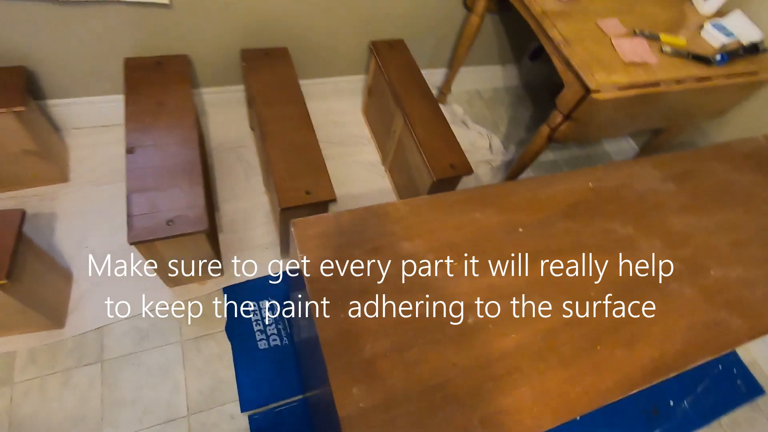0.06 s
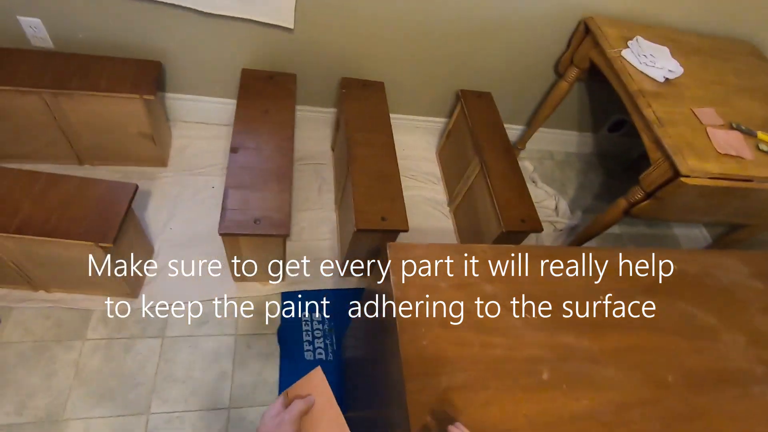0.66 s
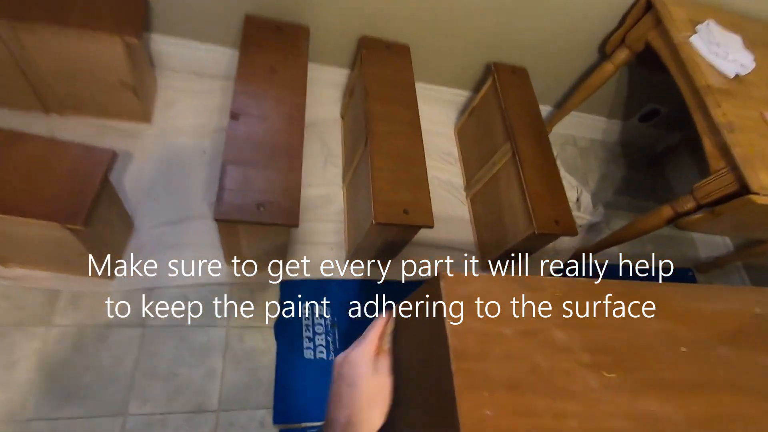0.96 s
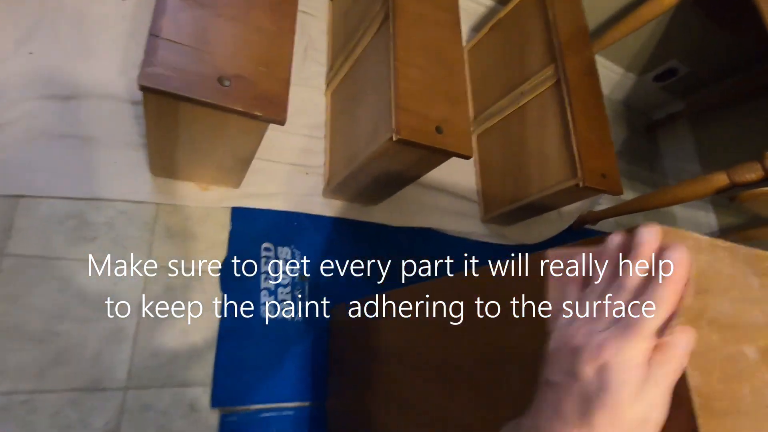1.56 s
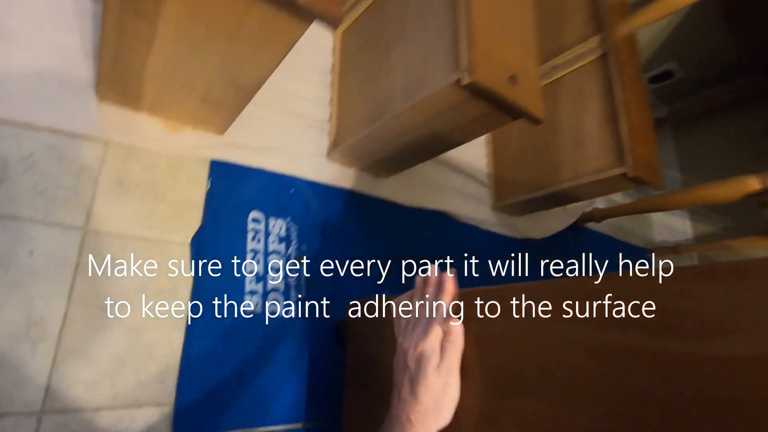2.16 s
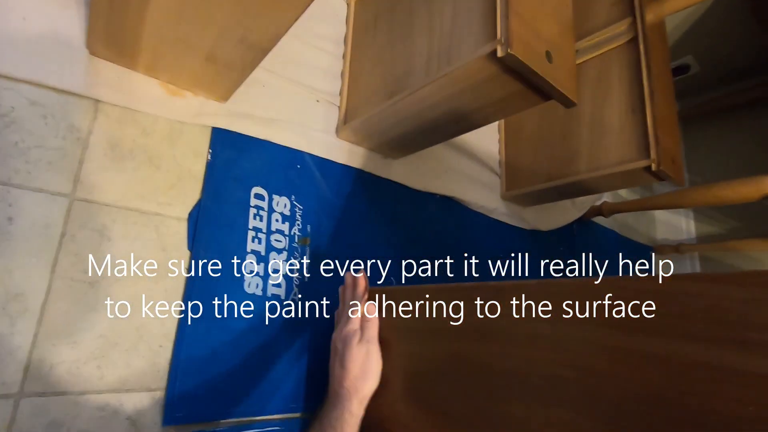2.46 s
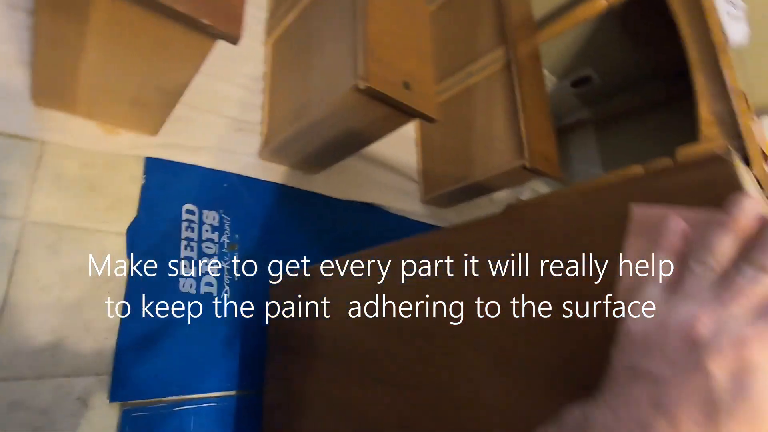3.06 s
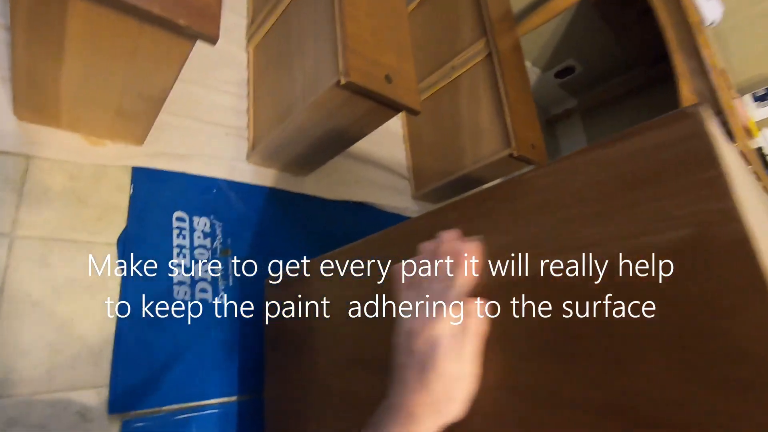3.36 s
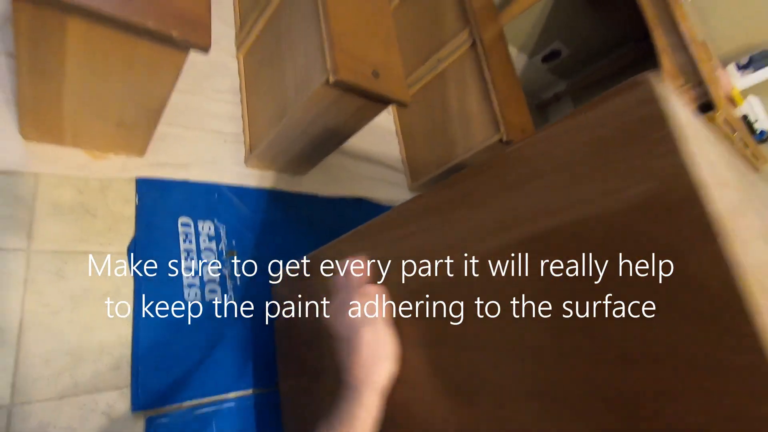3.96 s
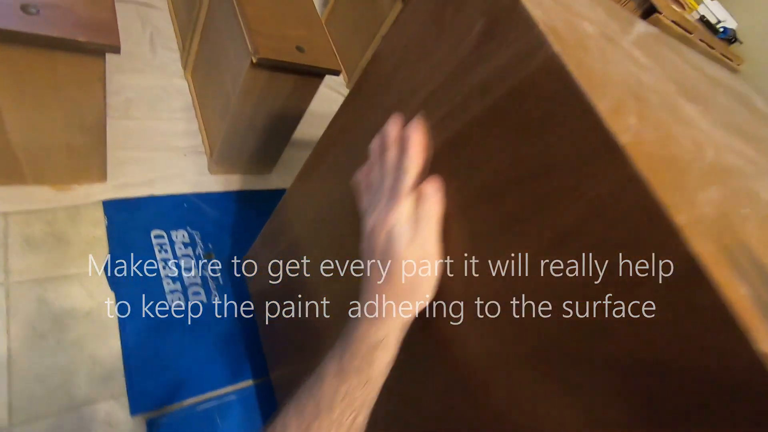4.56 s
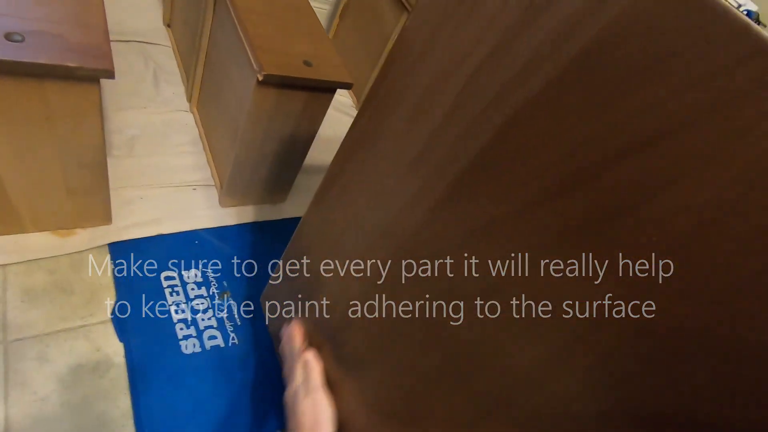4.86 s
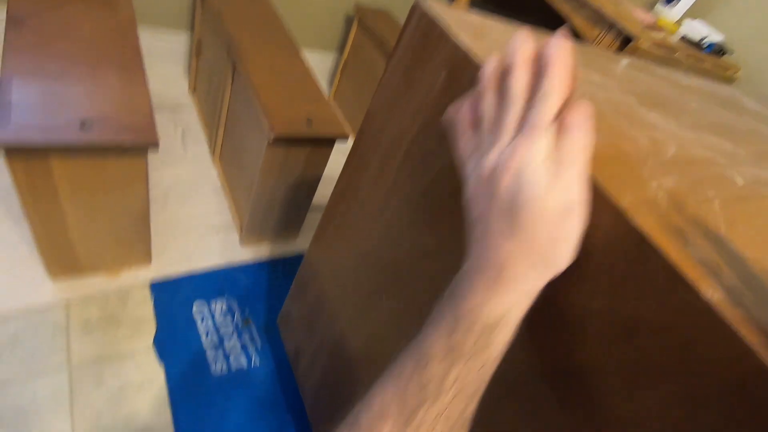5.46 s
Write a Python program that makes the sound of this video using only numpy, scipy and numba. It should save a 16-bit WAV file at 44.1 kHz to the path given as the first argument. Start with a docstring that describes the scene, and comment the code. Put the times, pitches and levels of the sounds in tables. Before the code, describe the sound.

In a small room, someone handles a stiff sheet of sandpaper and bumps a wooden dresser, then sands its side by hand. The gritty, hissing strokes go back and forth at an irregular pace, slowing briefly at the turns, with a hollow rasp from the wood and occasional knocks and paper snaps. The nearby hand-held microphone catches a few low puffs of air and a very faint appliance hum.

```python
"""Sandpaper is rubbed to and fro by hand over the side of a hollow wooden dresser in a small room.
Its grit catches and lets go thousands of times a second, so the paper hisses, the side panel rasps
and the wooden body drones. Cloth and paper rustle first; dull knocks and sharp paper ticks come
before and during the strokes. Air puffs against the hand-held microphone and an appliance hums."""
import sys
import numpy as np
from scipy import signal
from scipy.fft import rfft, irfft
from scipy.io import wavfile
from scipy.ndimage import uniform_filter1d
from numba import njit

SR = 44100
rng = np.random.default_rng(int(sys.argv[2]) if len(sys.argv) > 2 else 0)


def output_pcm(signal):
    """Save a mono or channel-first signal as 16-bit PCM at the path in sys.argv[1].

    Samples are clipped to [-1, 1] before scaling.
    """
    pcm = np.clip(np.atleast_2d(signal).T, -1, 1) * 32767
    wavfile.write(sys.argv[1], SR, np.round(pcm).astype(np.int16))


N = 247401
T = np.arange(N) / SR
FFT_SIZE = 2 ** 18
FREQS = np.fft.rfftfreq(FFT_SIZE, 1 / SR) + 1e-3


# Strokes, each lasting until the next. Place 0 is the stiff top corner, about 1 the loose lower end.
# start t/s, start place, share of speed kept in the turn, speed-up/s, slow-down/s,
# hiss level/dB, its change along the stroke/dB, treble share/dB,
# sheet ring f/Hz, its glide/Hz, ring against hiss/dB, air pocket f/Hz, pocket against hiss/dB
STROKES = [ (1.337, 0.83, 0.062, 0.099, 0.066, -33, 0, -4, 3230, 0, -5, 1370, -13),
           (1.565, 0.17, 0.16, 0.048, 0.095, -32, 0.5, -3, 3430, 0, -6.5, 1330, -16.5),
           (1.734, 0.27, 0.2, 0.056, .07, -34, 2.5, -4.5, 3300, 200, -12, 1345, -16.5),
           (2.451, 0.52, 0.65, 0.11, 0.055, -28.5, 3.5, -4.5, 3440, 2, -6.5, 1390, -10),
           (2.584, 0.82, 0.11, 0.061, 0.2, -29.5, 2.5, -2.5, 4550, 2398, -6, 1420, -18),
           (3.207, 0.19, .1, 0.11, .05, -31.5, -1, -4.5, 3730, -800, -8.5, 1425, -19),
           (3.912, 0.88, 0.43, 0.055, 0.18, -30.5, 1.5, -3.5, 4100, 6, -13, 1520, -19),
           (4.438, 0.3, .11, 0.11, 0.068, -33, -3, -3.5, 3380, 800, -5, 1530, -17),
           (5.09, 1.06, 0.15, 0.063, 0.095, -32, 1, -3.5, 3750, -400, -9, 1495, -18.5), ]
# The hand presses or eases for a moment: t/s, hiss change/dB, wood change/dB, length/s
PRESSES = [(1.845, 5.5, 0, 0.11), (1.936, 1, 2, 0.051), (2.36, 1.5, -1.5, 0.057), (2.519, 0, 7.5, 0.036),
           (2.625, -4.5, 3.5, 0.089), (2.753, 2, -3.5, 0.095), (3.123, -4.5, 8, 0.11),
           (3.667, 1.5, -1, 0.04), (3.807, -3, -1, 0.15), (3.877, 1.5, 5, 0.075), (4.143, 1.3, 0.5, 0.19),
           (4.384, 7, 6.5, 0.065), (4.534, -2.5, -4.5, 0.088), (4.653, 0, -1.5, 0.048),
           (5.032, 2, 7, 0.021), (5.152, -5, 2, 0.053), (5.342, 1, 1, 0.081)]


def sanding():
    """Grit catches in uneven bursts, shaking the sheet, the air under the hand and the wood."""
    speed, place, stroke, along = hand()
    settings = uniform_filter1d(np.transpose(STROKES)[5:, stroke], size=900)  # blend stroke into stroke
    hiss_db, change_db, treble_db, ring_hz, glide_hz, ring_db, pocket_hz, pocket_db = settings
    paper_press_db = sum(db * swell(t, length) for t, db, _, length in PRESSES)
    wood_press_db = sum(db * swell(t, length) for t, _, db, length in PRESSES)
    hiss_db = hiss_db + change_db * (along - .5) + paper_press_db
    ring_hz = ring_hz + glide_hz * (along - .5)
    ring_db = ring_db + 0.2 * paper_press_db  # pressing makes the sheet ring more
    swing = np.sin(np.pi * along) - 2 / np.pi  # the arm swings most freely in mid-stroke
    grip = (1 + 0.12 * flurries(per_s=570, decay_s=0.0041)) * undb(.5 * wander(per_s=34))
    grit = [unit(grip * grains(per_s=15000, spread_db=2.0)) for _ in range(4)]
    on_sheet, on_ring, on_pocket, on_wood = grit
    hiss = paper_hiss(on_sheet, on_ring, speed, swing, ring_hz, ring_db, treble_db)
    pocket = air_pocket(on_pocket, speed, swing, pocket_hz) * undb(pocket_db)
    dresser = rasp_and_drone(on_wood * undb(wood_press_db), speed, place)
    touching = np.clip((T - STROKES[0][0]) / 0.0081, 0, 1)  # silent until the first stroke
    return ((hiss + pocket) * undb(hiss_db) + dresser) * touching


# Tone of grit on paper: f/Hz, level/dB
PAPER_TONE = [(500, -27), (1100, -16.5), (2000, -6), (2450, -1.5), (2850, 4), (3350, 5.5), (4000, 3),
              (4600, 1.5), (5200, -1.5), (6800, -4.5), (8200, -11), (9400, -7.5), (10900, -24),
              (14000, -30), (15300, -43)]


def paper_hiss(on_sheet, on_ring, speed, swing, ring_hz, ring_db, treble_db):
    """Faster grit hisses louder and brighter; the sheet's ring wanders as the fingers shift."""
    paper = colour(PAPER_TONE)
    sheet = unit(filtered(on_sheet, paper))
    ring_hz = ring_hz * (1 + .06 * wander(per_s=16))
    ring = unit(moving_band(filtered(on_ring, paper), ring_hz, width_hz=650.))
    ring = ring * undb(ring_db + 2.6 * wander(per_s=16))
    treble_db = treble_db + 1.5 * swing + 0.41 * 20 * np.log10(speed)
    return brighten(sheet + ring, treble_db, split_hz=5040) * speed ** 1.68


def air_pocket(grit, speed, swing, hz):
    """Air under the hand rings, higher in mid-stroke and lower as the hand slows."""
    hz = hz * (1 - 0.05 * (1 - speed) + .06 * swing)
    once = moving_band(grit, hz, width_hz=390.)
    twice = moving_band(once, hz, width_hz=390.)
    return unit(twice) * speed ** 1.86


# Grit pushes the body in short jerks, which favour its higher notes: f/Hz, level/dB
JERK_TONE = [(150, -6), (250, -1.5), (305, -3), (400, 4.5)]


def rasp_and_drone(grit, speed, place):
    """The wood answers most at its loose end, and fades less than the hiss when the hand slows."""
    rasp_db, drone_db = -54.5 + 11 * place, -60 + 13.5 * place
    grit = grit * undb(1.08 * wander(per_s=54))
    rasp = grit * undb(rasp_db) * speed ** 0.46
    drone = filtered(grit, colour(JERK_TONE)) * undb(drone_db) * speed ** 0.37
    drag = undb(np.exp(-((speed - 0.64) / 0.19) ** 2))  # grit digs in at middling speed: up to 1 dB
    return wood(rasp * drag, drone * np.sqrt(drag))


# Notes at which the side panel rings: f/Hz, width/Hz, level/dB
PANEL_MODES = [(525, 72, 1), (683, 93, -6.5), (803, 55, 3), (1000, 114, -0.5), (1290, 255, 1),
               (1717, 385, 9), (1820, 570, 7.5), (2530, 230, -21)]
# Low notes of the hollow body: f/Hz, width/Hz, level/dB
BODY_MODES = [(169, 35, -1.5), (200.5, 22.5, 4), (199.7, 68, 1.5), (263, 30.4, 3), (304.7, 22.2, 4.5),
              (338, 58, -9.5), (474, 87, -17)]


def wood(panel_force, body_force):
    """Panel and body ring at their own notes (modes) and give off little sound below the lowest."""
    sound = 0
    for force, modes, cut_hz in ((panel_force, PANEL_MODES, 380), (body_force, BODY_MODES, 140)):
        # neighbouring modes swing in opposite directions
        notes = sum((-1) ** k * undb(db) * resonance(hz, width)
                    for k, (hz, width, db) in enumerate(modes))
        bass_cut = signal.butter(6, cut_hz, "high", fs=SR, output="sos")
        response = notes * signal.sosfreqz(bass_cut, FREQS, fs=SR)[1]
        sound = sound + filtered(force, response / np.sqrt(np.mean(np.abs(response) ** 2)))
    return sound


def hand():
    """The hand's speed (0-1), place, stroke number and way along it (0-1); it never quite stops."""
    end_s, end_place, end_speed = 5.625, 0.15, .15
    starts, places, turn_speeds, rises, falls = np.transpose(STROKES)[:5]
    turns = np.append(starts, end_s)
    pace = sum(movement(*timing) for timing in zip(starts, turns[1:], rises, falls))
    slowest = np.interp(T, turns, np.append(turn_speeds, end_speed))
    speed = np.sqrt(slowest ** 2 + (1 - slowest ** 2) * pace ** 2)
    place = np.interp(T, turns, np.append(places, end_place))
    progress = np.interp(T, turns, np.arange(len(turns)))
    stroke = np.minimum(progress.astype(int), len(starts) - 1)
    return speed, place, stroke, progress - stroke


# Dull knocks on the wood: t/s, body level/dB, panel level/dB, fade time/s, treble cut f/Hz
KNOCKS = [(-.01, -53.5, -51.5, 0.41, 1100), (0.718, -58, -59, 1, 700), (.848, -57, -53.5, 0.33, 2000),
          (0.866, -44, -40.5, 0.21, 1190), (1.118, -48, -50, 0.3, 2000), (1.26, -57, -48, 0.34, 2000),
          (1.349, -43.5, -52, 0.31, 191), (1.424, -45.5, -37, 0.071, 1470),
          (2.522, -47.5, -38.5, 0.22, 1820), (2.55, -57, -38, 0.091, 1800),
          (3.937, -51, -37.5, 0.082, 1900), (4.151, -42, -33, 0.028, 880), (4.159, -36.5, -62, 0.13, 230),
          (4.903, -50, -37, 0.039, 1200), (5.139, -46, -42, 0.061, 1200)]


def knocks():
    """Each blow pushes the wood once, then rattles; a softer contact sounds darker."""
    panel, body = 0, 0
    rattle = rng.standard_normal(N)
    for t, body_db, panel_db, fade_s, cut_hz in KNOCKS:
        force = rattle * fade(t, fade_s) + 2.27 * fade(t, fade_s=.0015)
        softened = signal.sosfilt(signal.butter(2, cut_hz, fs=SR, output="sos"), force + 1e-18)
        panel = panel + undb(panel_db) * softened
        body = body + undb(body_db) * softened
    return wood(panel, body)


# Snaps of the paper: t/s, level before the shared tone/dB, f/Hz, width/Hz, fade time/s
TICKS = [(0.095, -44, 3100, 910, 0.0077), (0.1005, -43, 3100, 380, 0.042), (1.121, -54, 3100, 2500, 0.21),
         (1.232, -41.5, 5900, 2630, 0.012), (1.264, -36, 3600, 2500, 0.0074),
         (1.267, -47.5, 3520, 3000, 0.17), (1.329, -39, 6500, 4000, 0.0088), (1.351, -42, 4000, 1200, .012),
         (2.604, -24, 5170, 3450, 0.03), (3.167, -28, 5970, 2430, 0.008)]
# Tone shared by all the snaps: f/Hz, level/dB
TICK_TONE = [(200, -6), (1000, 10.5), (7000, -3.5), (9500, -10), (11500, -20), (15000, -26)]


def ticks():
    """The stiff sheet snaps in short, bright bursts of noise."""
    noise = rng.standard_normal(N)
    snaps = sum(unit(filtered(noise, resonance(hz, width))) * undb(db) * fade(t, fade_s)
                for t, db, hz, width, fade_s in TICKS)
    return filtered(snaps, colour(TICK_TONE))


# Sleeve and loose paper move: start t/s, end t/s, rise/s, fall/s, level/dB, treble share/dB
RUSTLES = [(-.02, 0.058, 0.017, 0.13, -41.5, -5.5), (0.043, 0.323, 0.027, .04, -62.5, -21),
           (0.24, 0.356, 0.042, 0.098, -63, -12), (0.283, 0.61, 0.067, 0.13, -57.5, -6),
           (0.592, 1.126, 0.42, 0.16, -55, -8), (1.106, 1.198, .015, 0.12, -58, -6),
           (1.228, 1.4, 0.0073, 0.05, -54.5, -9)]
# Tone of their rustle: f/Hz, level/dB
RUSTLE_TONE = [(250, -6), (500, -6), (760, 2), (1000, -4.5), (1400, 1), (1750, 1), (2080, 3), (2500, -0.5),
               (3400, -2), (4600, -3.5), (5200, -9), (6500, -8), (8200, -12), (9600, -13.5), (10900, -38),
               (15000, -40)]
# The sheet slips between the fingers: t/s, level/dB, f/Hz, length/s
SCUFFS = [(0.422, -57, 5800, 0.022), (0.493, -55, 6300, 0.017), (0.567, -59.5, 4000, 0.023),
          (0.684, -60.5, 4160, 0.05)]


def rustle():
    """Cloth and loose paper slide softly until the hand lands on the wood."""
    fibres = filtered(grains(per_s=19000, spread_db=3.0), colour(RUSTLE_TONE))
    cloth = sum(brighten(fibres, treble_db, split_hz=4800) * undb(db) * movement(*timing)
                for *timing, db, treble_db in RUSTLES)
    noise = rng.standard_normal(N)
    scuffs = sum(unit(filtered(noise, resonance(hz, 0.36 * hz) ** 2)) * undb(db) * swell(t, length)
                 for t, db, hz, length in SCUFFS)
    return cloth + scuffs


# Puffs of air and handling bumps on the microphone: t/s, level/dB, f/Hz, length/s
PUFFS = [(1.094, -34.5, 46.2, 0.03), (1.129, -43, 87.5, 0.02), (1.176, -46.5, 44, 0.042),
         (1.48, -33, 25.8, 0.028), (1.569, -37, 22, 0.057), (2.547, -51, 95, .018), (2.63, -52, 32, .05)]


def air_puffs():
    """Each puff pushes the microphone's thin skin through a slow swing or two."""
    phases = rng.uniform(0, 2 * np.pi, len(PUFFS))
    return sum(undb(db) * swell(t, length) * np.sin(2 * np.pi * hz * (T - t) + phase)
               for (t, db, hz, length), phase in zip(PUFFS, phases))


# Tone of the background, a low room rush plus a very faint high hiss: f/Hz, level/dB
BACKGROUND_TONE = [(20, 6), (60, -12), (105, -12), (150, 6.5), (250, 6.5), (330, -8), (750, -13),
                   (1100, -25.5), (4000, -22), (9500, -24), (11500, -60), (15000, -52)]


def background():
    """A quiet, low room rush and a very faint high hiss waver together in level."""
    noise = unit(filtered(rng.standard_normal(N), colour(BACKGROUND_TONE)))
    return noise * undb(-65.5 + 2.2 * wander(per_s=6))


def appliance_hum():
    """An appliance hums one low note, wavering slightly in pitch and level."""
    hz = 169.4 * (1 + 0.0015 * wander(per_s=6))
    hum = unit(np.sin(2 * np.pi * np.cumsum(hz) / SR))
    return hum * undb(-65 + 1.2 * wander(per_s=6))


def room_echo(x):
    """Walls and furniture add a short echo, strongest in the bass."""
    tail = rng.standard_normal(N) * fade(0, fade_s=0.21) * (T > .006)
    tone = colour([(400, 8.5), (2000, -1.0), (8000, 4.5)])
    response = rfft(tail / np.linalg.norm(tail), FFT_SIZE) * tone
    return x + undb(-14.5) * filtered(x, response)


# Stereo width: f/Hz, scattered against direct sound/dB
STEREO_WIDTH = [(40, -3.5), (150, -10), (300, -13), (600, -4.5), (1000, -3), (1900, -4), (2800, -9),
                (4000, -12), (5500, -4), (6800, -3.5), (8000, 2.5), (9400, 2.5), (11500, -4.5),
                (14000, 1.5)]
# Stereo balance: f/Hz, left against right/dB
BALANCE = [(150, -2.5), (380, -0.5), (800, -6.5), (1400, -3), (2300, -2), (6000, -1), (7500, 3.5),
           (8800, -3.5), (13000, 0)]


def stereo(x):
    """Near surfaces scatter sound to the microphone's two openings; paths shift as things move."""
    wide = filtered(x, colour(STEREO_WIDTH))
    shares = np.array([wander(per_s=18.6) for _ in range(4)])
    side = 0
    for share in shares / np.linalg.norm(shares, axis=0):
        scatter = rfft(rng.standard_normal(N) * fade(0, fade_s=0.019), FFT_SIZE)
        side = side + share * filtered(wide, scatter / np.abs(scatter))  # smears time, keeps tone
    lean = np.sqrt(colour(BALANCE))
    return np.array([filtered(x + side, lean), filtered(x - side, 1 / lean)])


def grains(per_s, spread_db):
    """Tiny clicks at random moments, a few much bigger than the rest."""
    hits = rng.random(N) < per_s / SR
    signs = rng.choice([-1, 1], N)
    sizes = undb(spread_db * np.minimum(rng.exponential(size=N), 6))
    return unit(hits * signs * sizes)


def flurries(per_s, decay_s):
    """The sheet catches suddenly and lets go slowly; varies around 0 by about 1."""
    catches = (rng.random(N) < per_s / SR) * rng.exponential(size=N)
    load = signal.lfilter([1], [1, -np.exp(-1 / (decay_s * SR))], catches)
    return unit(load - load.mean())


def wander(per_s):
    """Smooth random drift, about 1 in size."""
    size = max(int(SR / per_s), 2)
    return unit(uniform_filter1d(uniform_filter1d(rng.standard_normal(N), size), size))


def movement(start, end, rise_s, fall_s):
    """Speed of one movement, 0-1: it gathers pace, holds it and slows to rest."""
    rising = np.clip((T - start) / rise_s, 0, 1)
    falling = np.clip((end - T) / fall_s, 0, 1)
    return np.sin(np.pi / 2 * rising) * np.sin(np.pi / 2 * falling)


def swell(centre, length):
    """Smooth rise and fall around a moment."""
    return np.exp(-2 * ((T - centre) / length) ** 2)


def fade(start, fade_s):
    """Start suddenly, then drop by 60 dB every fade_s seconds."""
    age = T - start
    return (age >= 0) * np.exp(-np.log(1000) * np.clip(age / fade_s, 0, 10))


def brighten(x, treble_db, split_hz):
    """Give the treble above split_hz its own share of the power, at most 90%."""
    treble = filtered(x, 1 / (1 + (split_hz / FREQS) ** 8))
    share = np.clip(undb(treble_db) ** 2, 0, .9)
    return unit(np.sqrt(share) * unit(treble) + np.sqrt(1 - share) * unit(x - treble))


@njit
def moving_band(x, hz, width_hz):
    """Let through a band of pitches whose centre moves (a state-variable filter)."""
    y, band_state, low_state = np.empty(len(x)), 0., 0.
    for i in range(len(x)):
        tuning, damping = np.tan(np.pi * hz[i] / SR), width_hz / hz[i]
        band = (band_state + tuning * (x[i] - low_state)) / (1 + tuning * (tuning + damping))
        band_state = 2 * band - band_state
        low_state += 2 * tuning * band
        y[i] = damping * band
    return y


def resonance(hz, width):
    """Tone curve of one ringing note, with gain 1 at its centre."""
    return 1 / (1 + 1j * (FREQS ** 2 - hz ** 2) / (FREQS * width))


def colour(points):
    """Tone curve through points of f/Hz, level/dB."""
    hz, db = np.transpose(points)
    return undb(np.interp(np.log(FREQS), np.log(hz), db))


def filtered(x, response):
    """Shape x with a tone curve."""
    return irfft(rfft(x, FFT_SIZE) * response, FFT_SIZE)[:N]


def undb(db):
    """Turn decibels into a gain."""
    return 10 ** (np.asarray(db) / 20)


def unit(x):
    """Scale to an average (rms) level of 1."""
    return x / np.sqrt(np.mean(x ** 2))


def scene():
    """The sanding and its small noises echo in the room, over puffs, background and hum."""
    work = sanding() + rustle() + knocks() + ticks()
    return stereo(room_echo(work) + air_puffs() + background() + appliance_hum())


def record(dry):
    """Cut the highest treble steeply."""
    top_hz = 15300
    return signal.sosfilt(signal.ellip(10, .2, 80, top_hz, fs=SR, output="sos"), dry)


dry = scene()
out = record(dry)
output_pcm(out)
```